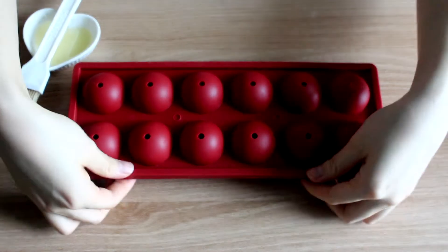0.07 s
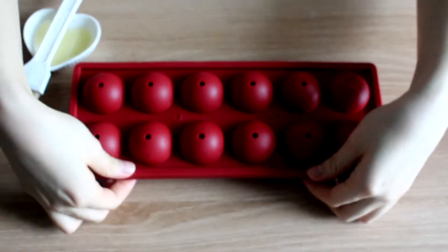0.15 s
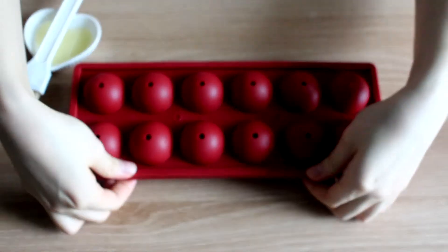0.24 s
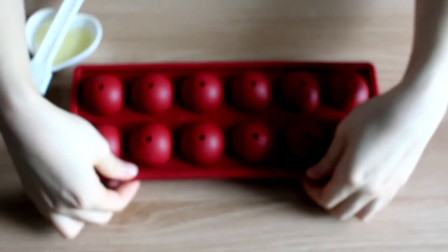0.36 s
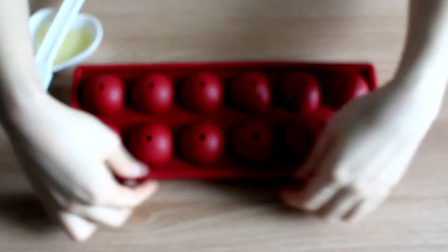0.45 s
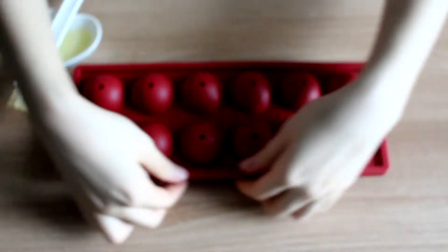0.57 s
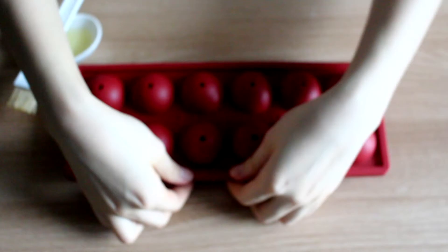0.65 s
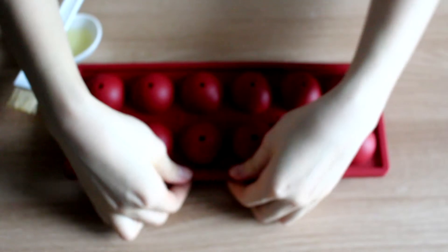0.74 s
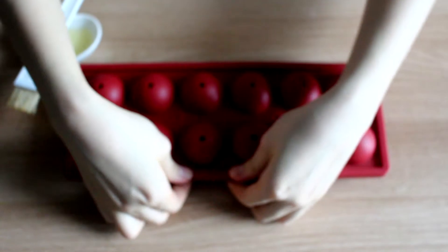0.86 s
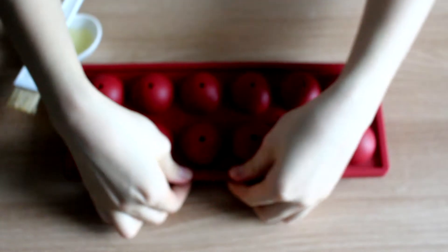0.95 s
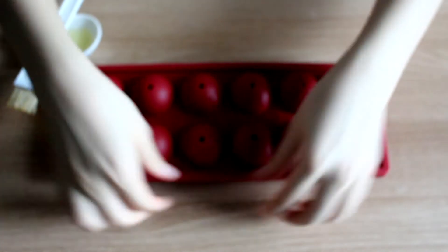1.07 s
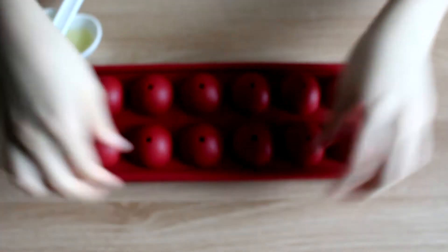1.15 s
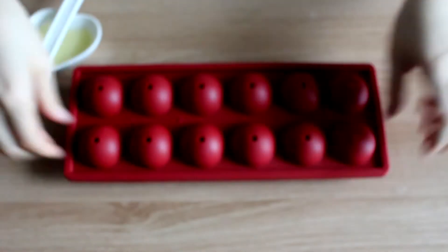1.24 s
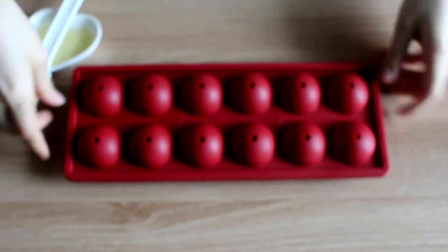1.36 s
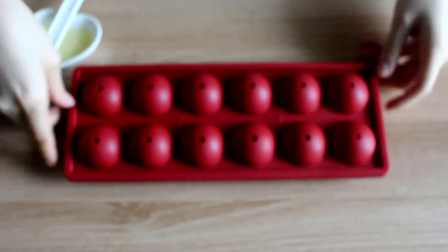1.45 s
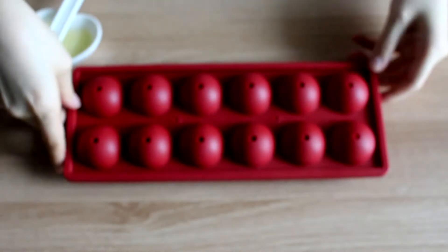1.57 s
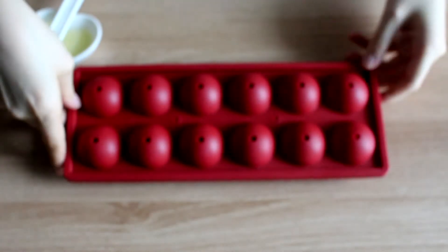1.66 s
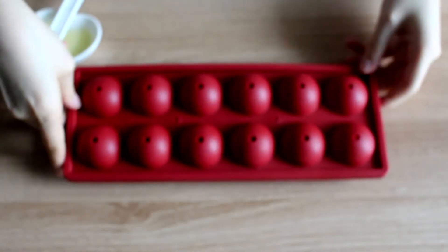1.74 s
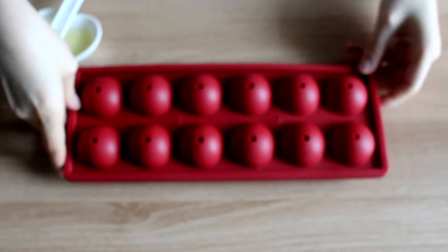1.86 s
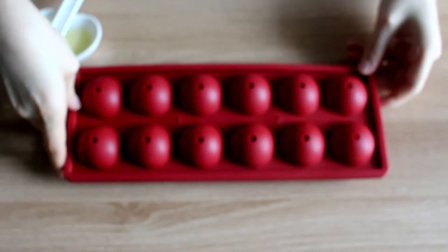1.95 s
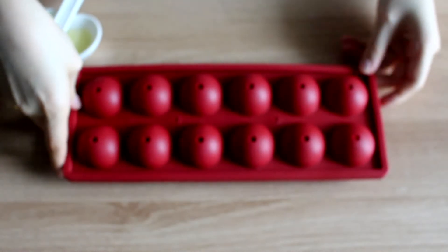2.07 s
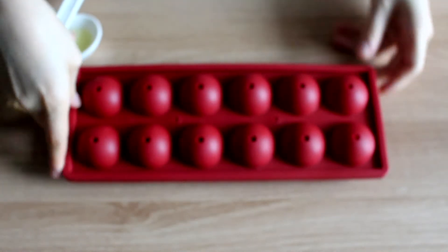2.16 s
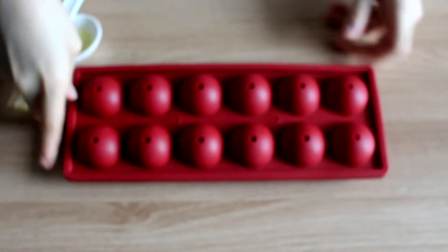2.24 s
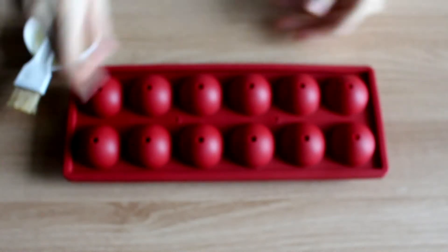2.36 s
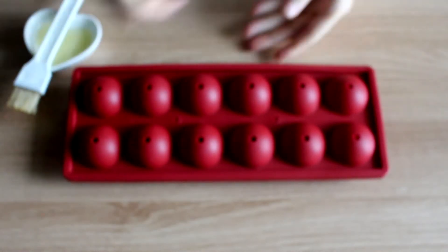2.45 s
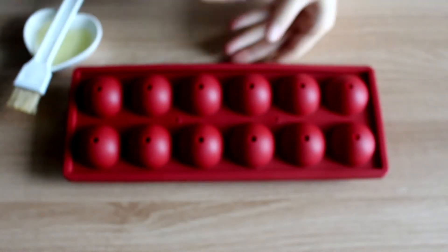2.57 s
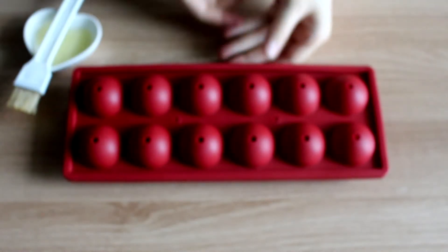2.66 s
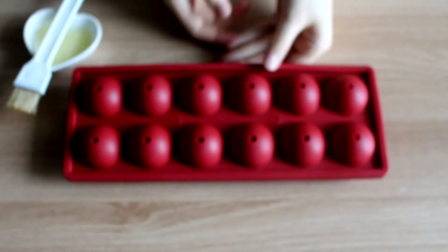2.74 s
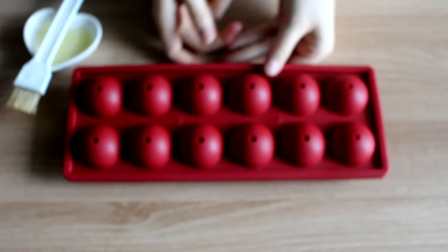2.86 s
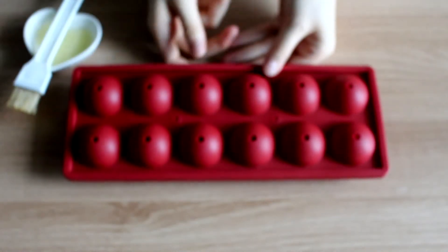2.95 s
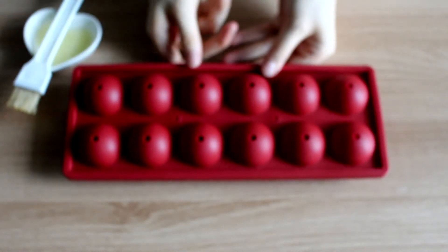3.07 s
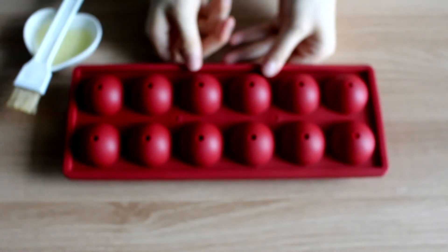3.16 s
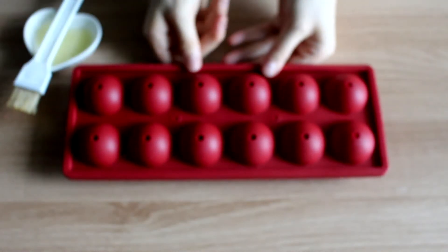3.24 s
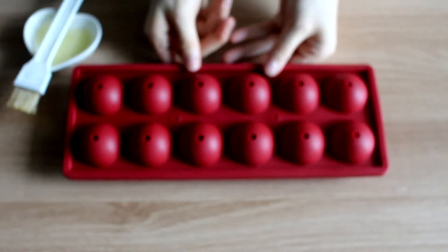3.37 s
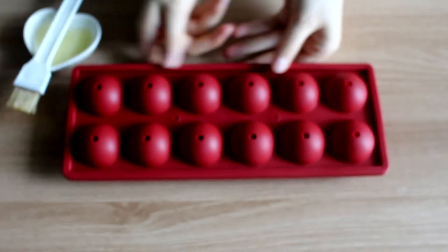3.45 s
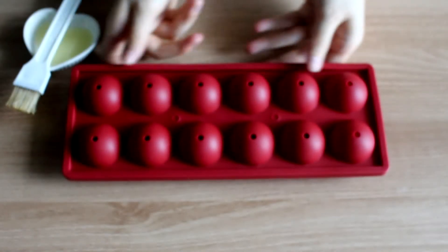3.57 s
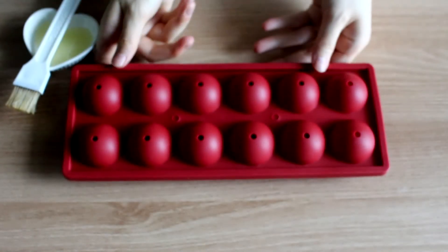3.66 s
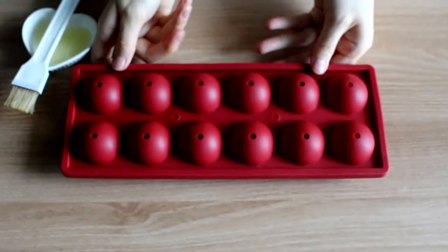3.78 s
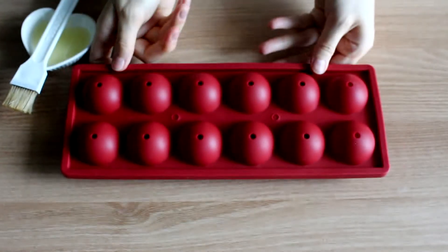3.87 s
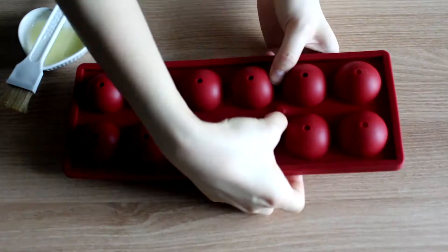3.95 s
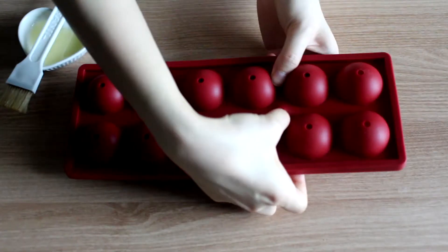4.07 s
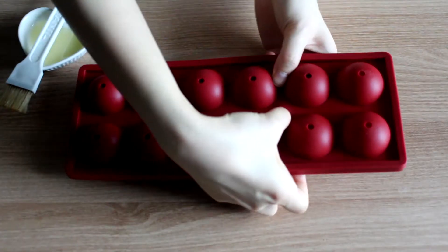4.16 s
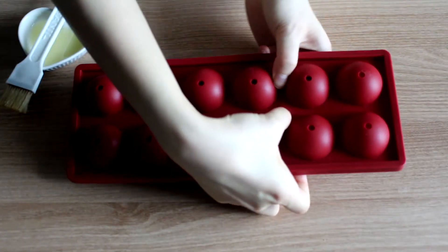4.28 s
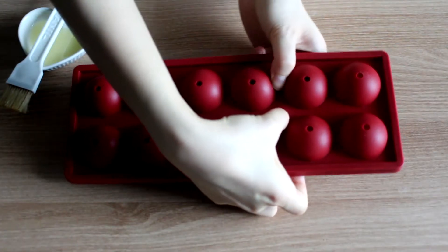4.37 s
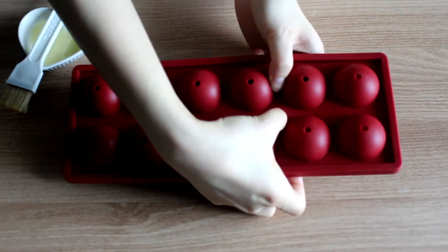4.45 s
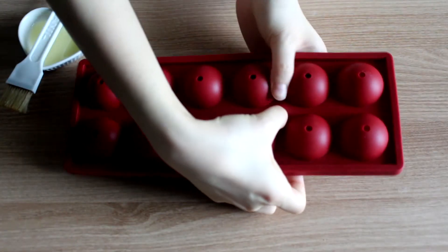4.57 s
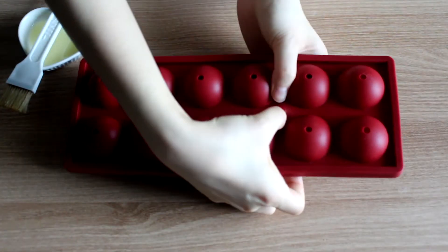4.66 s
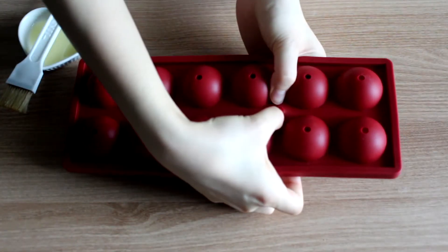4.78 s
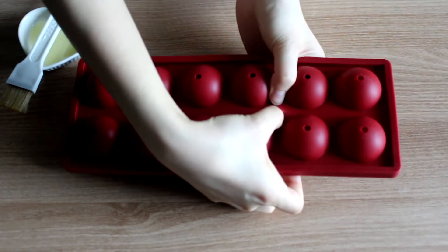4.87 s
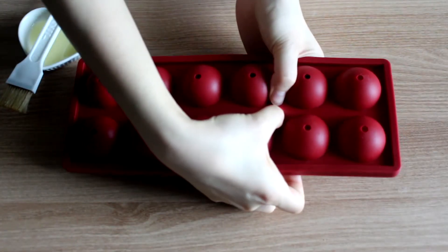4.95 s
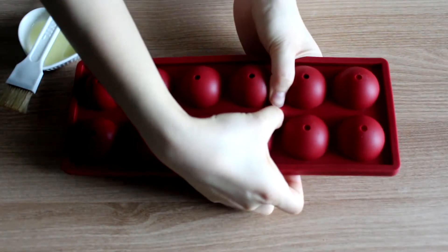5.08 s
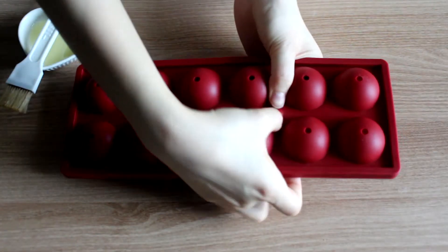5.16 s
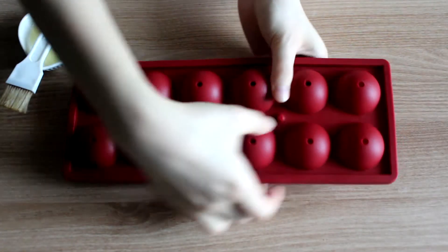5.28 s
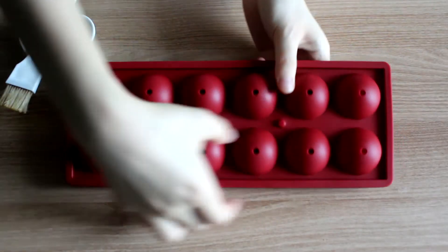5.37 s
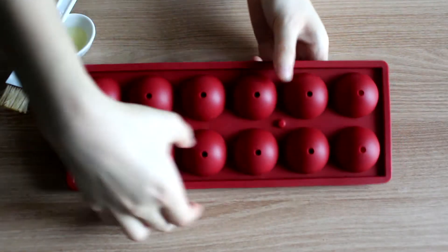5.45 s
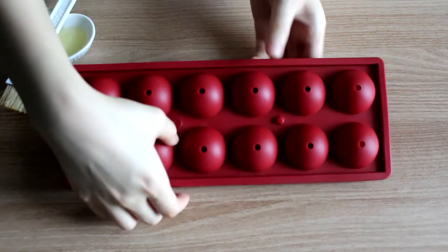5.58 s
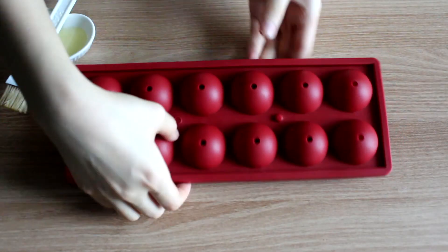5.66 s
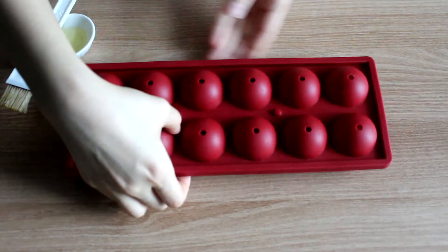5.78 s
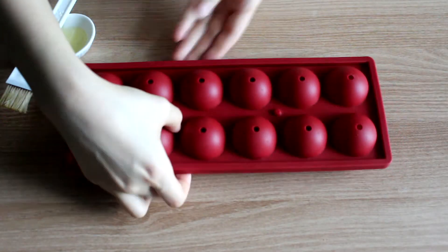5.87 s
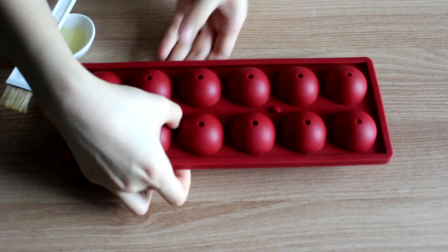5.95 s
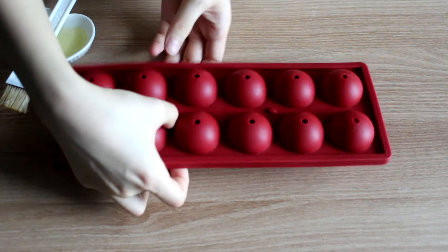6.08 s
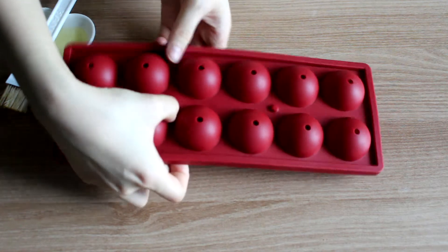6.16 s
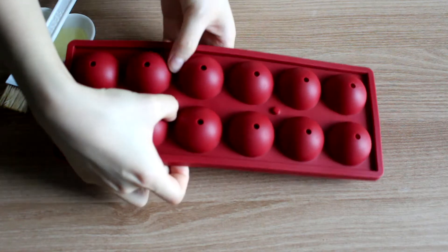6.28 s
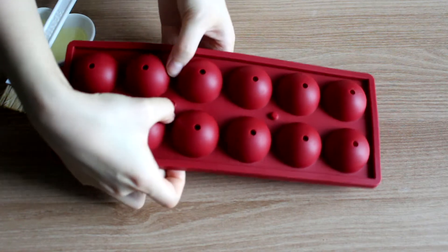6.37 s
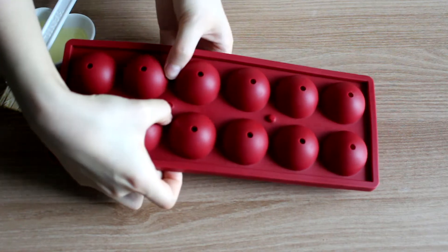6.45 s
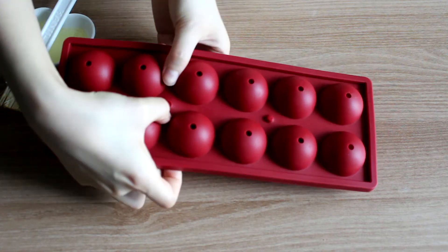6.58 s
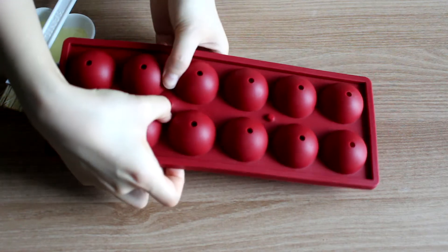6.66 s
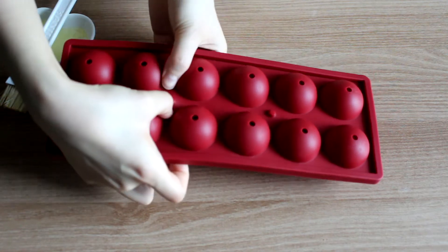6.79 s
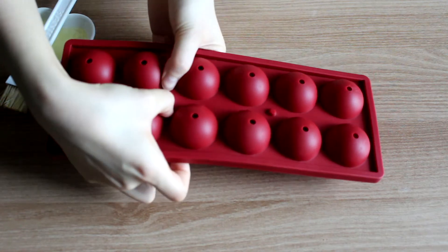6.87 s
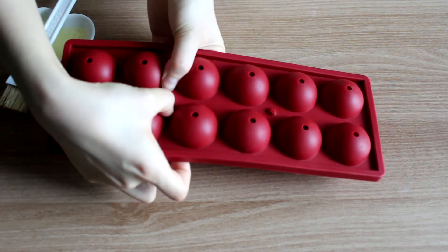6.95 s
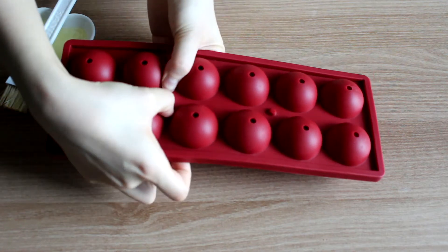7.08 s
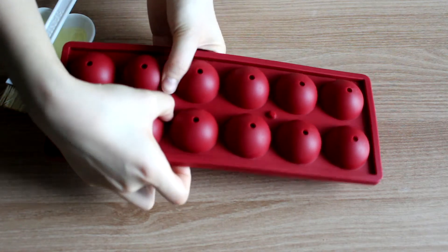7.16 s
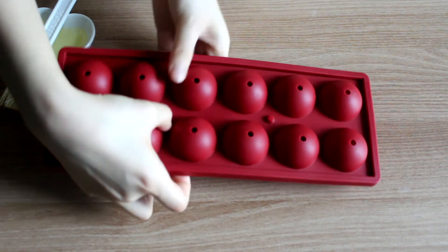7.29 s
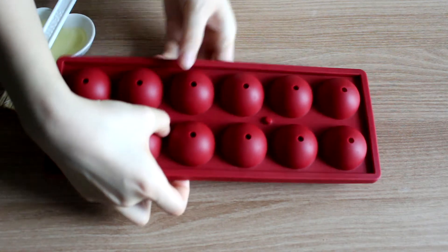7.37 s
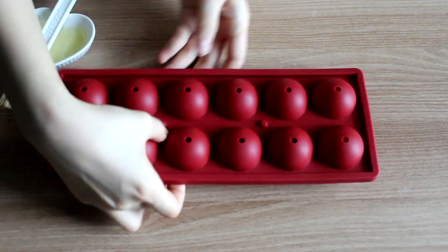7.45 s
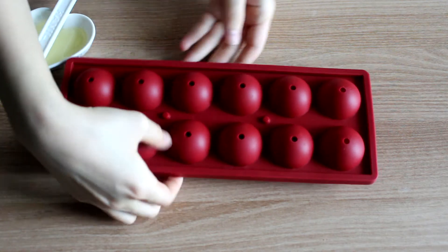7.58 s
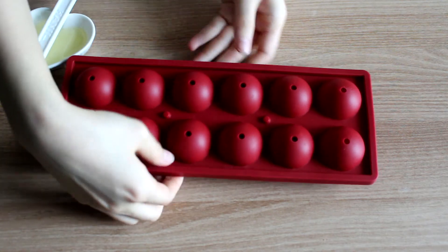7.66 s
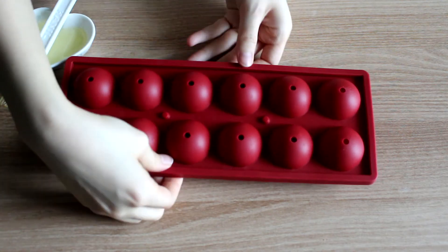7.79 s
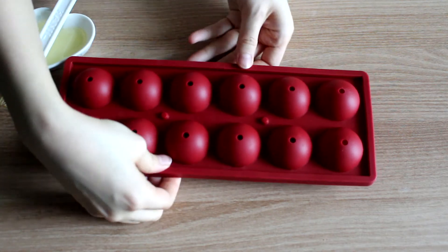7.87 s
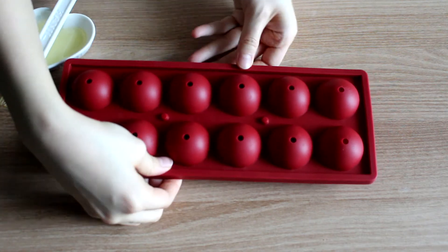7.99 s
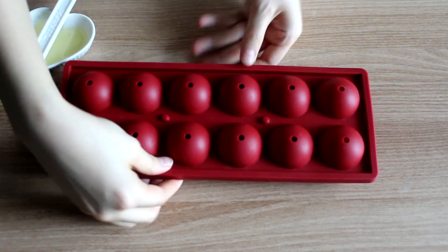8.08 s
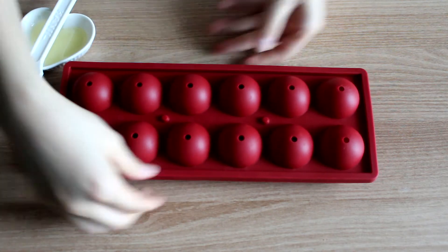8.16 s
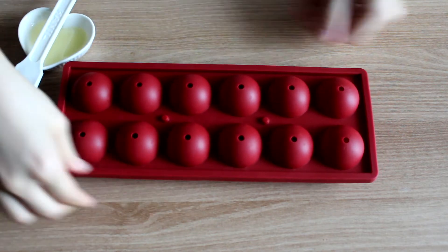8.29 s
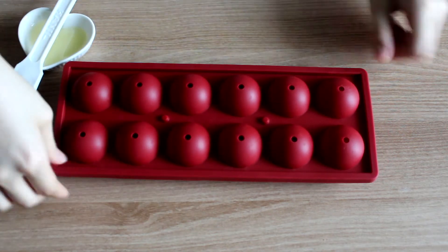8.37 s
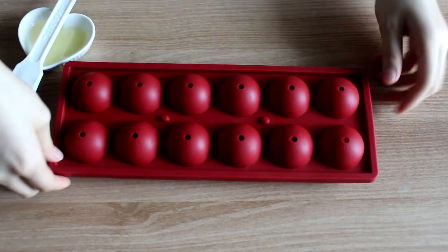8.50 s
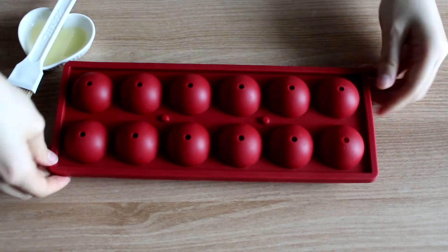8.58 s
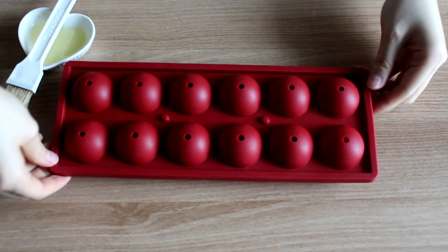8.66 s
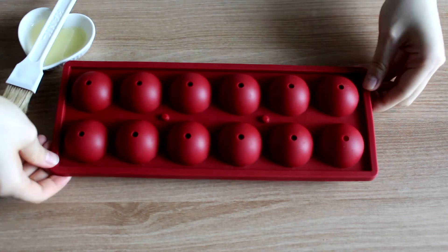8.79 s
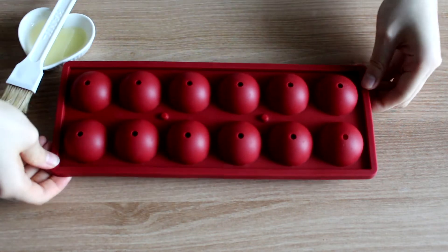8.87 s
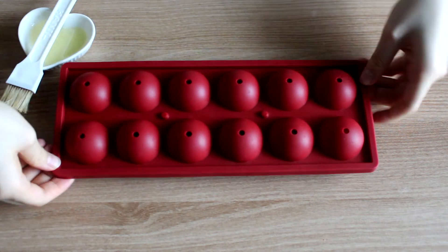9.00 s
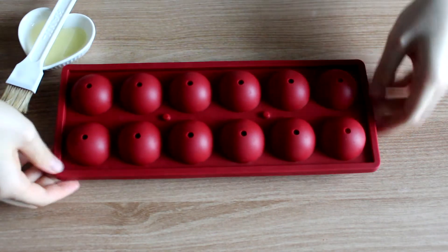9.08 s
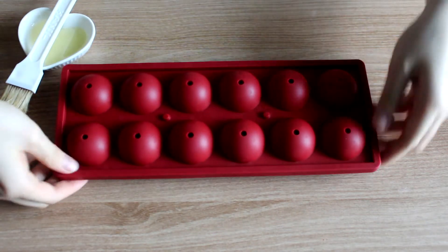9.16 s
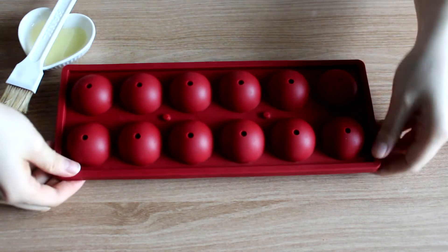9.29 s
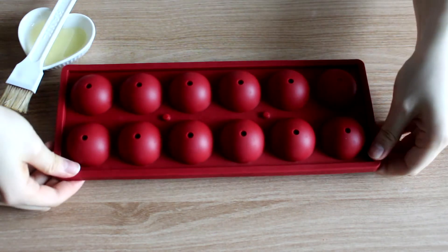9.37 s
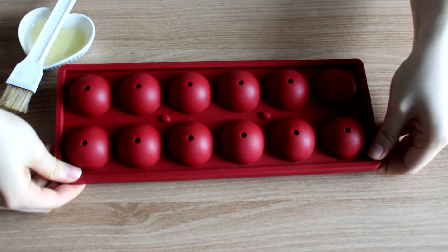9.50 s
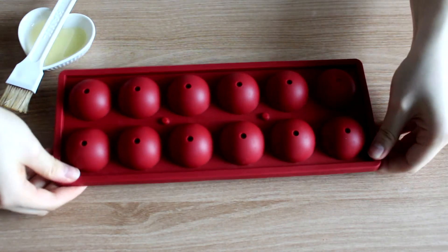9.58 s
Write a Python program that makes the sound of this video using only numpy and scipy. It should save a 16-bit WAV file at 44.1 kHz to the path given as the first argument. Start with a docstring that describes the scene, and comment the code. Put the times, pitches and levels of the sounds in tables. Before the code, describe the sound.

Close stereo microphones in a small quiet room pick up hands pressing a silicone mold on a wooden table. Faint skin rubbing leads into scattered soft taps and bumps, one firmer early on. Midway, rubber sticks and slips in a very short, falling groan with a thin squeak. More light taps follow, then the loudest sharp knock, a close pair of knocks later and a last modest bump. Faint hiss, rumble and hum continue beneath.

```python
"""Close to the microphones, hands press the lid of a silicone mold onto its tray on a wooden table, small room.
A faint skin rub comes first, then taps and bumps as shaped noise ringing in mold, table top and room.
Near 3.8 s rubber sticks and slips: a short groan of ringing pulses over a dry scrape, with a thin squeak.
The loudest knock falls near 5.7 s, a pair near 7.5 s, the last at 9.6 s; rubs and nail clicks come between.
Throughout lie microphone hiss and house rumble as coloured noise, and a low wavering hum."""
import sys
import numpy as np
from scipy import signal
from scipy.fft import rfft, irfft, next_fast_len
from scipy.io import wavfile
from scipy.ndimage import uniform_filter1d

SR = 44100
rng = np.random.default_rng(int(sys.argv[2]) if len(sys.argv) > 2 else 0)


def materialize(psi):
    """Save the field psi as 16-bit PCM at rate SR to the path in sys.argv[1].

    A 1-D psi becomes a single channel; in a 2-D psi each row is a channel.
    """
    bounded = np.clip(np.atleast_2d(psi).T, -1, 1)
    quanta = np.round(bounded * 32767).astype(np.int16)
    wavfile.write(sys.argv[1], SR, quanta)


N = 424683
TIME = np.arange(N) / SR  # s
SIZE = 32768  # samples in the buffer of one contact
HZ = np.fft.rfftfreq(SIZE, 1 / SR)
TOP_HZ = 15720  # band limit of the recorder
LEAD_S = .008  # space in a contact's buffer for the brush ahead of the landing

# likeness of left and right in the room and in the scrape: f/Hz, correlation
ROOM_LIKENESS = [(200, 0.96), (1200, 0.87), (3000, 0.21), (8000, 0.13)]


def amp(db):
    """Decibels to gain."""
    return 10 ** (np.asarray(db) / 20)


def unit(x):
    """x at rms 1."""
    return x / np.sqrt(np.mean(x ** 2) + 1e-20)


def along(points, hz):
    """Read (f/Hz, value) points on a log frequency axis."""
    f, v = np.transpose(points)
    return np.interp(np.log(hz + 1), np.log(f + 1), v)


def filtered(x, response):
    """x times a response of frequency."""
    n = x.shape[-1]
    m = next_fast_len(n + SIZE)
    return irfft(rfft(x, m) * response(np.fft.rfftfreq(m, 1 / SR)), m)[..., :n]


def causal(gain):
    """The minimum-phase response with this gain."""
    cepstrum = irfft(np.log(np.maximum(gain, 1e-6)))
    cepstrum[1:SIZE // 2] *= 2
    cepstrum[SIZE // 2 + 1:] = 0
    return np.exp(rfft(cepstrum))


def stereo(pair, spectrum, alike):
    """Colour two signals as mid and side, and blend them into left and right of a given likeness."""
    def mid_side_gain(hz):
        turn = np.arccos(np.clip(along(alike, hz), -1, 1)) / 2
        return amp(along(spectrum, hz)) * [np.cos(turn), np.sin(turn)]

    mid, side = filtered(pair, mid_side_gain)
    return np.array([mid + side, mid - side])


def add(track, s, sound):
    """Mix a sound into the track at time s."""
    part = track[:, round(s * SR):][:, :sound.shape[-1]]
    part += sound[..., :part.shape[1]]


def contacts():
    """Fingers and rim bump tray and table; each contact also flexes the whole board, as strongly as it knocks."""
    # contacts: t/s, ring of the struck spot f/Hz, strength level/dB,
    # weight of the hand level/dB, hardness level/dB, time to settle t/s
    bumps = [(0.411, 1110, -46.5, -3, -1.5, 0.021), (0.475, 1470, -52.5, 7.5, -13, .005),
             (0.679, 676, -51.5, -12, 2, .005), (0.687, 643, -47, -5, -2, 0.0086),
             (0.755, 499, -28, -13.5, 2.5, .004), (1.054, 750, -34, -18, -11.5, 0.0046),
             (1.363, 2390, -44.5, 12.5, 9, 0.022), (1.721, 1060, -57, 6.5, -19, 0.0094),
             (1.855, 2920, -48, -9.5, 5, 0.0046), (2.111, 810, -42, -14, -2.5, .012),
             (2.154, 1040, -45, -15, -15, .005), (2.207, 840, -49, 8, 1, 0.0098),
             (2.465, 890, -53.5, 6, 6, 0.012), (2.936, 1010, -37, -21, 2, 0.0064),
             (2.962, 1660, -40.5, -23, -0.5, 0.015), (3.176, 676, -52.5, -2.5, -8, 0.014),
             (3.429, 870, -39, -12, 2.5, 0.0067), (3.504, 595, -69, 19, -2, 0.0063),
             (4.15, 545, -54.5, -14, -15, 0.0083), (4.197, 1530, -56.5, -14, -2, .005),
             (4.245, 577, -50, -13, -1, 0.0036), (4.525, 1440, -60.5, 0, 9, .005),
             (4.865, 415, -61.5, -5, 2, 0.0039), (5.091, 630, -51.5, -5, -6, 0.01),
             (5.16, 3700, -48, -15, 10.5, 0.0026), (5.211, 1580, -48, -22, 4.5, .003),
             (5.235, 553, -47.5, -12, 5, 0.003), (5.427, 850, -48.5, 2, -28, 0.0043),
             (5.447, 845, -38.5, -4.5, -2.5, 0.0094), (5.614, 845, -52, -3, -2, .006),
             (5.739, 1140, -20, -9, 0, 0.0028), (5.945, 810, -47, 4, 4, 0.014),
             (5.995, 1100, -52.5, 18, -2, 0.007), (6.212, 1020, -53.5, 4.5, 3, 0.011),
             (6.279, 1000, -49.5, -12, -9, 0.019), (6.406, 1040, -54, -29, 7.5, 0.0027),
             (6.544, 900, -57.5, 3.5, 1, .012), (7.316, 1050, -48.5, -8, 3, 0.0052),
             (7.459, 760, -46, -4.5, -2, 0.0062), (7.484, 1080, -42.5, -6, 1.5, 0.014),
             (7.533, 940, -31, -4.5, -1, 0.008), (7.556, 1166, -27.5, -13, -3, 0.0097),
             (7.74, 900, -51, -25, 0, 0.0095), (7.793, 1160, -55, -2, 0, 0.0046),
             (8.098, 1290, -42.5, -5, -7, 0.013), (8.122, 765, -48.5, -1.5, 1, 0.0053),
             (8.473, 596, -68.5, 15, -7, 0.0052), (8.74, 1060, -48, 1, -6, .005),
             (9.071, 810, -43, -8.5, -3, 0.024), (9.11, 664, -47.5, -0.5, 6, 0.014),
             (9.138, 1090, -51.5, -19, 3.5, 0.0038), (9.367, 950, -52, 4, -7, 0.0041),
             (9.556, 1000, -55.5, -15, -12, .005), (9.624, 1290, -35, -5, -0.5, 0.0085)]
    # bending modes of the whole table top: f/Hz, level/dB against the knock, t60/s
    bending = [(59.4, -30, 0.31), (85.8, -20.5, 0.36), (123, -21, 0.23)]
    track, t = np.zeros((2, N)), np.arange(SIZE) / SR
    flex = sum(amp(db - 60 * t / t60) * np.sin(2 * np.pi * f * t) for f, db, t60 in bending)
    for s, ring_hz, db, weight_db, hardness_db, settle_s in bumps:
        levels = registers(ring_hz, db, weight_db, hardness_db)
        # deep bass lies 19.5 dB under the strength, and at least 6 dB under the thump
        sub_db = min(-19.5 - weight_db, -6)
        # the roll starts 0.6 ms ahead of the flexing board
        add(track, s - LEAD_S - .0006, strike(ring_hz, levels, sub_db, settle_s))
        add(track, s, amp(levels[2]) * flex)
    return track


def registers(ring_hz, db, weight_db, hardness_db):
    """Thump, body, knock, snap and tick of a contact: weight feeds the bass, hardness the treble."""
    # lean of the energy with the ring: f/Hz, level/dB given to the knock and taken from the body
    knock_lean = [(500, -5.5), (900, -1), (1150, 3), (1600, 5), (2400, -2.5)]
    lean = along(knock_lean, ring_hz)
    snap = db - 9.5 + hardness_db
    # at ordinary hardness the tick is -69.5 dB at a strength of -46 dB, plus 0.54 dB per dB of strength
    tick = -69.5 + 0.54 * (db + 46) + hardness_db
    return np.array([db + weight_db, db - lean, db + lean, snap, tick])


def strike(ring_hz, levels, sub_db, settle_s):
    """One contact, heard directly, where the struck spot rings most, and through its own answer of the room."""
    near = blow(ring_hz, levels, ring_db=10.5, ring_q=2.8, spread_s=0.001019, sub_db=sub_db, top_db=-18.5)
    far = blow(ring_hz, levels, ring_db=8.5, ring_q=6.8, spread_s=0.000988, sub_db=sub_db - 22, top_db=-29)
    response = near + far * rfft(room(build_s=0.003, boom_db=-47))
    # slower contacts flap more: -11 dB at 3.8 ms, 7.5 dB more per doubling
    shiver_db = -11 + 7.5 * np.log2(settle_s / 0.0038)
    roll = touch(touch_s=0.0008, brush_s=0.0038, brush_db=-17, shiver_s=settle_s, shiver_db=shiver_db)
    return irfft(response * roll)[:, :SIZE // 2]


def blow(ring_hz, levels, ring_db, ring_q, spread_s, sub_db, top_db):
    """Response to one contact: register levels shared among the resonances, treble running ahead in the board."""
    # edges of thump, body, knock, snap and tick: f/Hz
    register_edges = [150, 400, 900, 1800, 4000, 12000]
    # resonances of the mold on the table: f/Hz, width f/Hz, lift level/dB
    resonances = [(350, 18, 1.5), (591, 61, 11.5), (681, 41, 5), (748, 61, 5), (1054, 380, 2.5),
                  (1116, 31, 4.5), (1285, 110, 5.5), (1490, 120, 4.5), (2380, 32, 9), (2920, 710, 1.5),
                  (3600, 1100, 1)]
    level_window_s = .011  # time over which the level of a contact is reckoned
    edges = np.array(register_edges)
    centres = np.sqrt(edges[1:] * edges[:-1])
    peaks = resonances + [(ring_hz, ring_hz / ring_q, ring_db)]
    colour = amp(sum(db / (1 + (2 * (HZ - f) / width) ** 2) for f, width, db in peaks))
    bands = [(HZ >= lo) & (HZ < hi) for lo, hi in zip(edges, edges[1:])]
    power = np.array([np.sum(colour[band] ** 2) for band in bands])
    # the energy of each register is shared out among its resonances
    density = levels + 10 * np.log10(level_window_s * SR * SIZE / 2 / power)
    bass = [(120, density[0] + sub_db), (195, density[0])]
    points = [*bass, *zip(centres, density), (TOP_HZ, density[-1] + top_db)]
    # bending waves: treble first, bass last; spread_s is the delay at the middle of the knock
    lag = np.exp(-4j * np.pi * spread_s * np.sqrt(HZ * centres[2]))
    return causal(colour * amp(along(points, HZ))) * lag


def touch(touch_s, brush_s, brush_db, shiver_s, shiver_db):
    """Flesh and rubber brush the surface, land in a brief ragged roll, and the soft tray shivers after."""
    after = np.arange(SIZE) / SR - LEAD_S
    u = np.maximum(after, 0) / touch_s
    landing = u * np.exp(1 - u)
    brush = amp(brush_db) * np.exp(-np.abs(after) / brush_s)
    shiver = amp(shiver_db) * np.exp(-np.abs(after) / shiver_s) * (after > 0)
    roll = rfft(rng.standard_normal(SIZE) * (brush + landing + shiver))
    # the roll carries equal power in every broad band
    return roll / np.sqrt(np.abs(uniform_filter1d(np.abs(roll) ** 2, size=400)) + 1e-9)


def room(build_s, boom_db):
    """The answer of table and room to one contact: a diffuse tail and a few low modes."""
    # low modes of table and room: f/Hz, relative level/dB, t60/s
    low_modes = [(88.4, -17, .4), (206.7, 1.5, 0.4), (265.5, -3, 0.24), (379.5, -6, 0.32), (450, -6, 0.27),
                 (604, -17.5, 0.14), (677, -5, 0.31), (1004, -5, 0.26), (1098, -15, .3), (1220, -9, 0.34)]
    # decay of the tail: f/Hz, t60/s
    decay = [(150, 0.17), (600, 0.31), (1200, 0.3), (3000, 0.34), (10000, 0.31)]
    # tail against the direct sound: f/Hz, level/dB
    tail_gain = [(100, -9), (250, -3.5), (600, -3.5), (1200, -4.5), (2500, -2), (8000, 2)]
    t = np.arange(SIZE) / SR
    hz, when, z = signal.stft(rng.standard_normal((2, SIZE)), SR, nperseg=256)
    fading = z * amp(-60 * when / along(decay, hz)[:, None])
    tail = signal.istft(fading, SR, nperseg=256)[1][:, :SIZE]
    spectrum = rfft(tail * (1 - np.exp(-(t / build_s) ** 2)))
    # the echoes carry equal power in every broad band
    spectrum /= np.sqrt(np.abs(uniform_filter1d(np.abs(spectrum) ** 2, size=200)))
    # the level of each mode varies at random from contact to contact, by 2 dB rms
    modes = sum(amp(db + rng.normal(0, 2) - 60 * t / t60) * np.sin(2 * np.pi * f * t)
                for f, db, t60 in low_modes)
    boom = amp(boom_db) * modes * (1 - np.exp(-t / build_s))
    return stereo(irfft(spectrum), tail_gain, ROOM_LIKENESS) + boom


def nails():
    """A nail catches the rim with a short bright click, made as a strike that leans to the snap."""
    # fingernails clicking on the rim: t/s, level/dB
    clicks = [(2.522, -63), (3.429, -60.5), (3.959, -52), (7.169, -65.5), (7.256, -65.5)]
    # thump, body, knock, snap and tick of a nail against its level: level/dB
    nail_colour = [-19, 1.5, 2, 6.5, 1]
    track = np.zeros((2, N))
    for s, db in clicks:
        levels = db + np.array(nail_colour)
        add(track, s - LEAD_S, strike(ring_hz=1740, levels=levels, sub_db=-14, settle_s=0.004))
    return track


def slip_train(rate):
    """Random tiny slips, rate per second on average, of either sign and uneven size, at rms 1."""
    happens = rng.random(N) < rate / SR
    size = amp(4.1 * np.minimum(rng.exponential(size=N), np.e))
    return unit(happens * size * rng.choice([-1, 1], N))


def rubbing():
    """Sliding skin catches in many tiny slips, and now and then lets go with a brighter tick."""
    # skin sliding on silicone and wood: middle t/s, half length t/s (power falls to 1/e), level/dB
    rubs = [(0.19, 0.054, -61), (0.434, 0.017, -54), (1.055, .035, -51.5), (1.852, 0.21, -59.5),
            (2.14, 0.047, -48.5), (2.545, .06, -61), (3.193, 0.093, -57), (4.18, 0.09, -58.5),
            (4.593, 0.041, -51), (5.278, 0.14, -55), (5.574, 0.11, -54), (5.976, 0.082, -50),
            (6.298, 0.16, -53.5), (7.376, 0.11, -50.5), (7.89, 0.29, -58.5), (9.07, .08, -52.5),
            (9.603, 0.041, -54.5)]
    # colour of the slide: f/Hz, relative level/dB per Hz
    slide_colour = [(100, -33), (210, -5), (400, -6), (620, 5), (800, -2.5), (1200, -4.5), (1800, -9.5),
                    (3000, -15), (6000, -29), (14000, -43.5)]
    # colour of the ticks: f/Hz, relative level/dB per Hz
    tick_colour = [(150, -3), (500, 7.5), (1200, -0.5), (2000, -12), (3500, -13), (6000, -16.5),
                   (14000, -31.5)]
    power = sum(amp(db) ** 2 * np.exp(-((TIME - s) / half) ** 2) for s, half, db in rubs)
    pressure = np.sqrt(power)
    ahead = np.array([[1], [0]])  # slips feed the mid signal only
    grain = slip_train(rate=400) * ahead + 1.24 * rng.standard_normal((2, N))
    slide = unit(stereo(grain, slide_colour, [(200, 0.28), (1200, 0.21), (4000, 0.12)]))
    ticks = unit(stereo(slip_train(rate=64) * ahead, tick_colour, [(200, .9)]))
    return pressure * (slide + amp(-12.5) * ticks)


def groan(slip_rate, ring_cycles, rough, scrape_db):
    """Rubber sticks and slips at an uneven rate over a dry scrape; each slip rings, mostly lower as it goes on."""
    # rubber sticking and slipping: t/s, level/dB before a trim of -0.5 dB, ring f/Hz
    stick_slip = [(3.745, -54, 900), (3.774, -35, 720), (3.795, -40, 650), (3.813, -39, 567),
                  (3.83, -32, 326), (3.865, -43.5, 374), (3.9, -44.5, 387), (3.915, -74, 360)]
    # colour of the scrape: f/Hz, relative level/dB per Hz
    scrape_colour = [(100, -40), (230, 10), (900, 12), (1500, 1.5), (2700, 0), (5000, -15), (14000, -44)]
    s, db, ring_hz = np.transpose(stick_slip)
    track, t = np.zeros((1, N)), np.arange(SIZE // 16) / SR
    chance = rng.standard_normal((80, 3))  # lateness, size and detuning of each slip
    for k, (late, size, detune) in enumerate(chance):
        start = s[0] + (k + rough * late) / slip_rate
        cycles = np.interp(start, s, ring_hz) * np.exp(0.12 * detune) * t
        envelope = np.exp(-cycles / ring_cycles) * (1 - np.exp(-2 * cycles))
        add(track, start, amp(2 * size) * np.sin(2 * np.pi * cycles) * envelope)
    sounding = (TIME > s[0]) & (TIME < s[-1])
    slips = track[0] / np.std(track[0, sounding])
    scrape = unit(stereo(rng.standard_normal((2, N)), scrape_colour, ROOM_LIKENESS))
    level = amp(np.interp(TIME, s, db - 0.5, left=-120, right=-120))
    return (slips + amp(scrape_db) * scrape) * level


def squeak(s, half_s, hz, width_hz, db):
    """A thin squeak of skin on rubber at the height of the groan: a narrow band of noise that swells and fades."""
    line = unit(filtered(rng.standard_normal(N), lambda f: np.exp(-((f - hz) / width_hz) ** 2)))
    return amp(db) * line * np.exp(-((TIME - s) / half_s) ** 2)


def background(hiss_db, rumble_db, hum_db, hum_hz):
    """Microphone hiss, the rumble of the house and a low hum whose phase wavers."""
    # colour of the hiss: f/Hz, relative level/dB per Hz
    hiss_colour = [(60, -10), (130, -8), (210, -7), (320, -9), (640, -9.5), (1000, -11.5), (1600, -15),
                   (3200, -17), (8000, -23), (15600, -31.5)]
    # likeness of left and right in the hiss: f/Hz, correlation
    hiss_likeness = [(150, 0), (700, 0), (1500, 0), (3000, 0), (8000, 0)]
    # colour of the rumble: f/Hz, relative level/dB per Hz
    rumble_colour = [(15, -7), (30, -2), (45, -2), (58, 16.5), (68, -12), (82, -22), (130, -32), (250, -44)]
    hiss = unit(stereo(rng.standard_normal((2, N)), hiss_colour, hiss_likeness))
    rumble = unit(stereo(rng.standard_normal((2, N)), rumble_colour, [(50, 0.76)]))
    waver = unit(filtered(rng.standard_normal(N), lambda hz: np.exp(-(hz / 4) ** 2)))
    hum = np.sin(2 * np.pi * hum_hz * TIME + 0.25 * waver)
    return amp(hiss_db) * hiss + amp(rumble_db) * rumble + amp(hum_db) * hum


def scene():
    """The hands work close to the middle, a little louder on the right; the background leans right even less."""
    rubber = groan(slip_rate=260, ring_cycles=1.35, rough=0.415, scrape_db=-5.5)
    rubber = rubber + squeak(s=3.84, half_s=0.016, hz=6530, width_hz=120, db=-57.0)
    hands = contacts() + nails() + rubbing() + rubber
    floor = background(hiss_db=-56.0, rumble_db=-66.5, hum_db=-63.5, hum_hz=57.0)
    # left and right trims, dB
    return hands * amp([[-.7], [.7]]) + floor * amp([[-.25], [.25]])


def record(dry):
    """The recorder keeps nothing above its band limit."""
    return filtered(dry, lambda hz: hz < TOP_HZ)


dry = scene()
out = record(dry)
materialize(out)
```